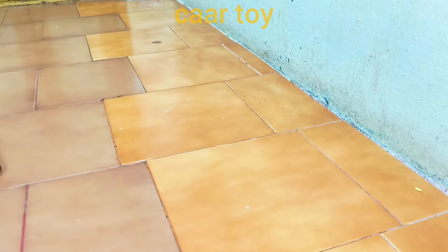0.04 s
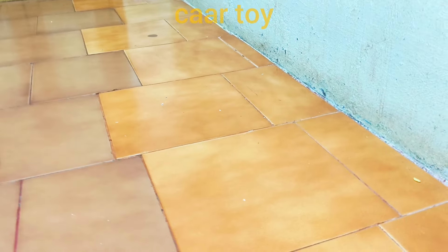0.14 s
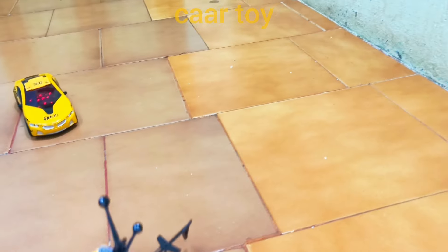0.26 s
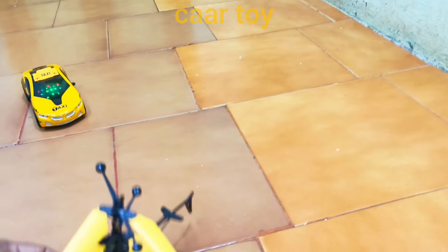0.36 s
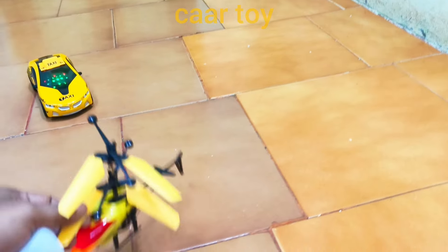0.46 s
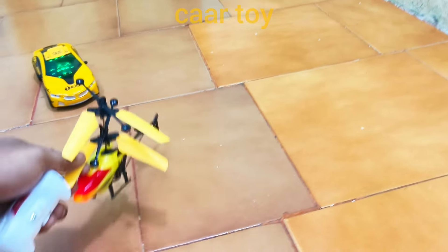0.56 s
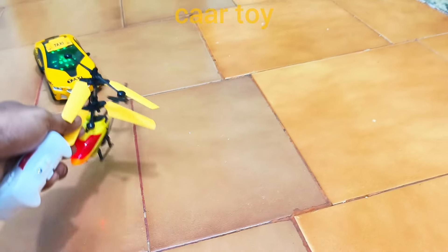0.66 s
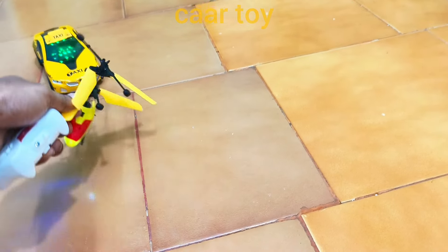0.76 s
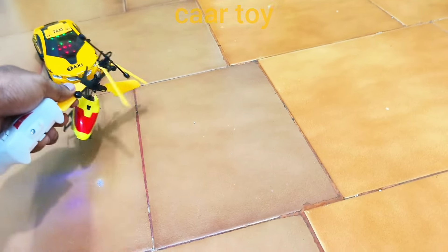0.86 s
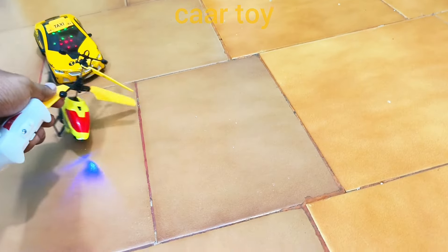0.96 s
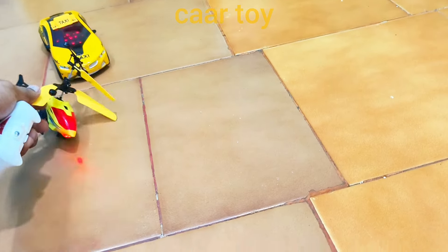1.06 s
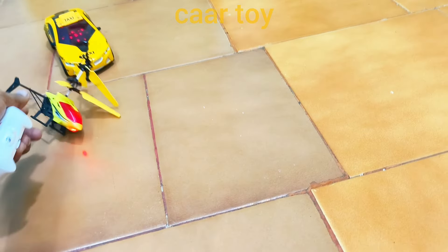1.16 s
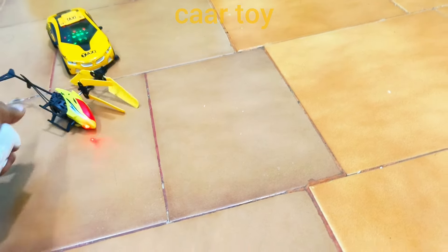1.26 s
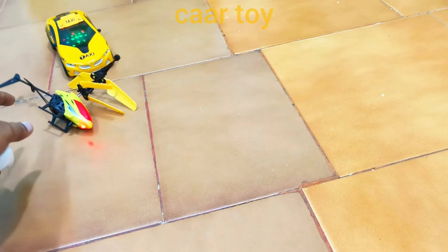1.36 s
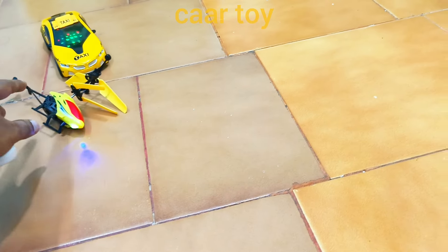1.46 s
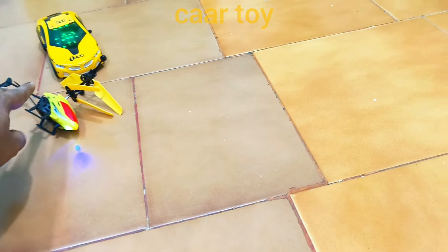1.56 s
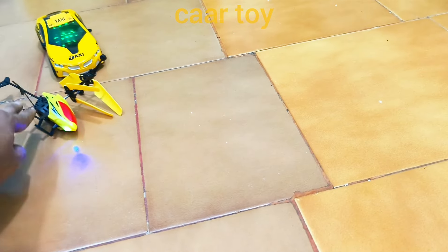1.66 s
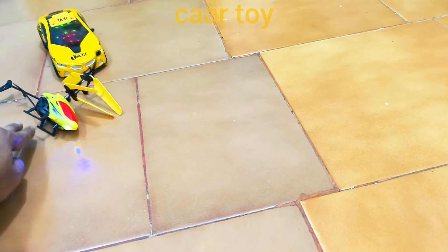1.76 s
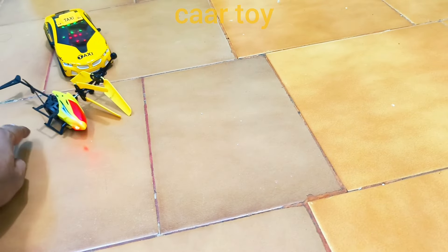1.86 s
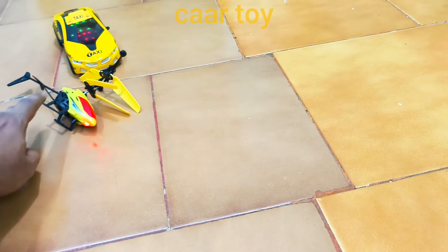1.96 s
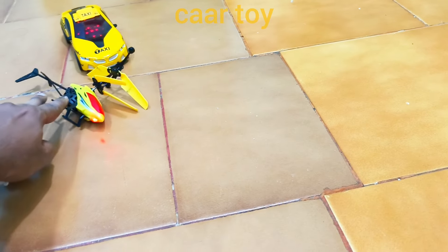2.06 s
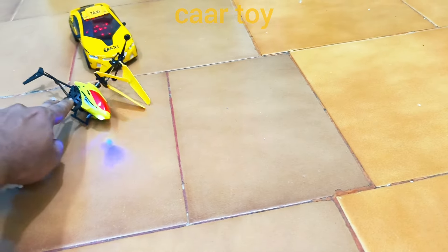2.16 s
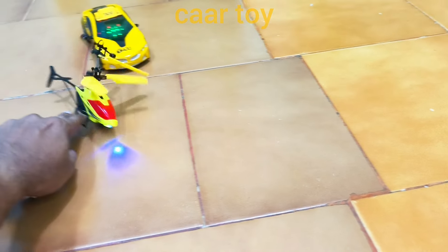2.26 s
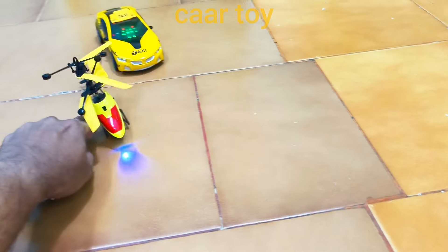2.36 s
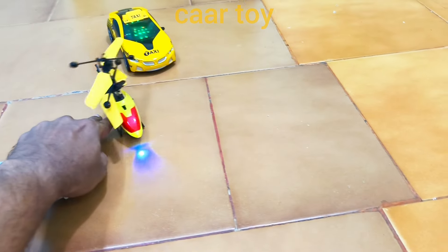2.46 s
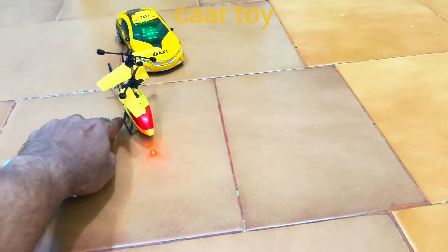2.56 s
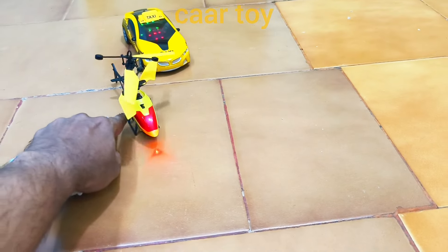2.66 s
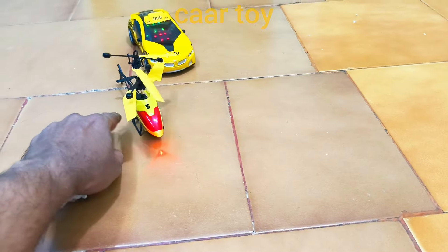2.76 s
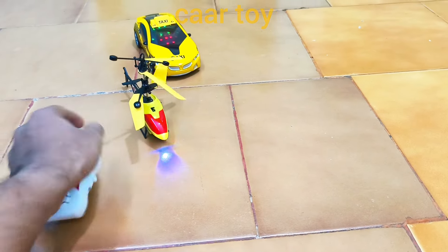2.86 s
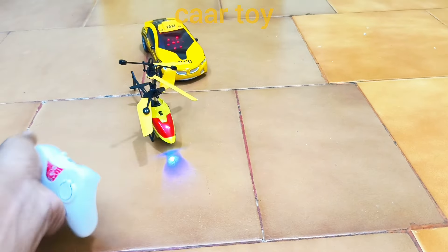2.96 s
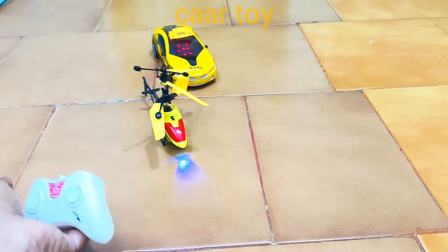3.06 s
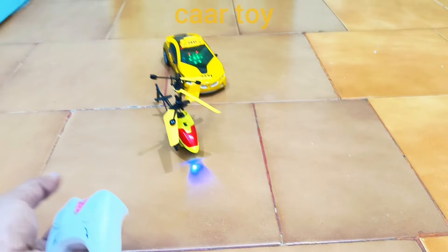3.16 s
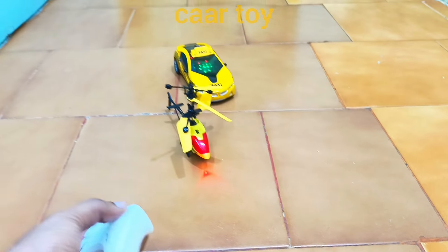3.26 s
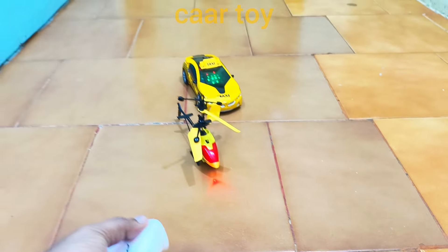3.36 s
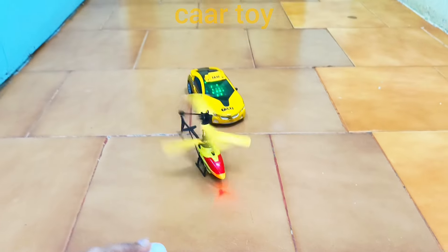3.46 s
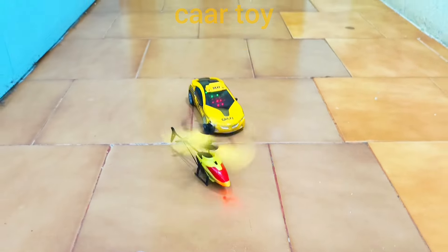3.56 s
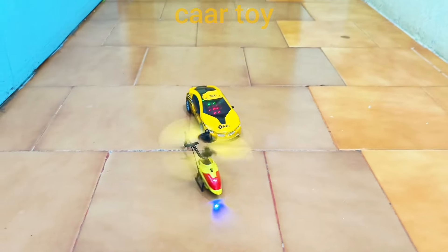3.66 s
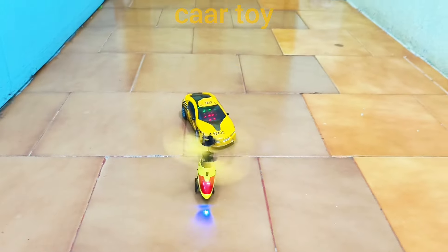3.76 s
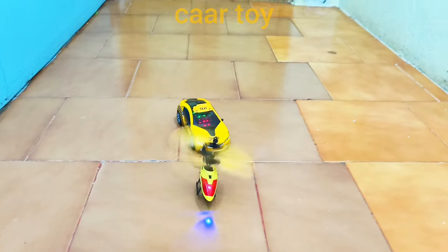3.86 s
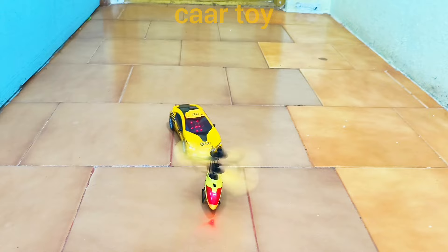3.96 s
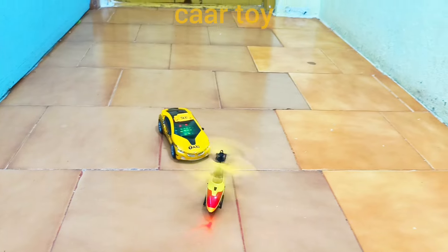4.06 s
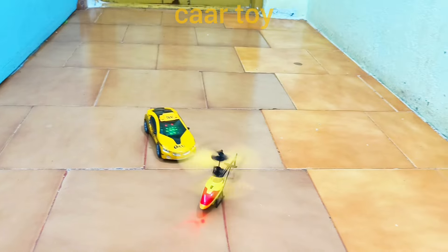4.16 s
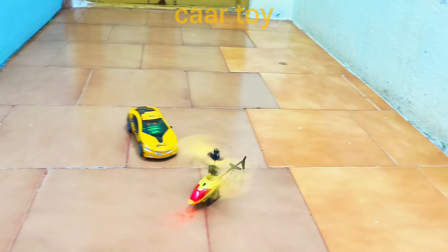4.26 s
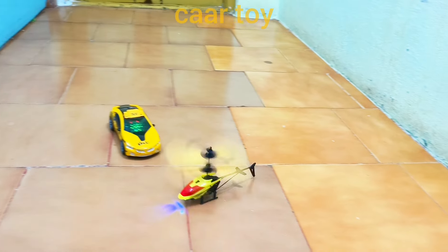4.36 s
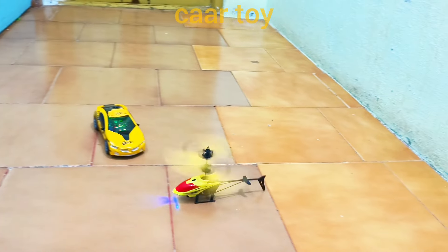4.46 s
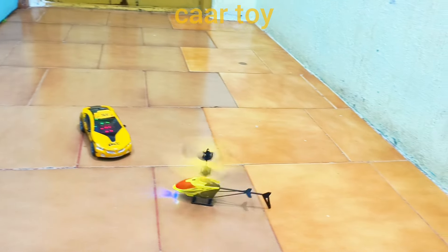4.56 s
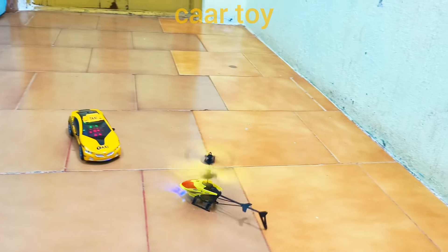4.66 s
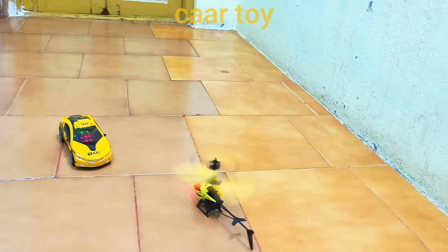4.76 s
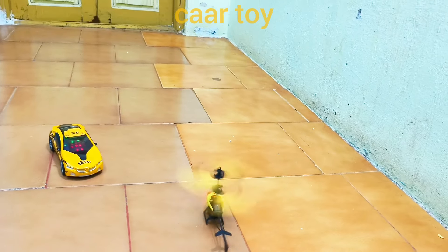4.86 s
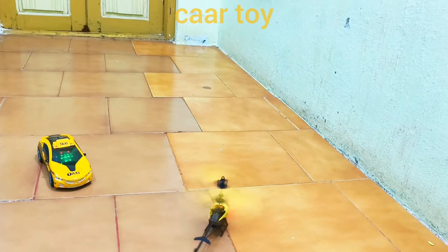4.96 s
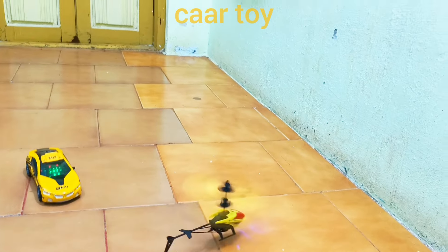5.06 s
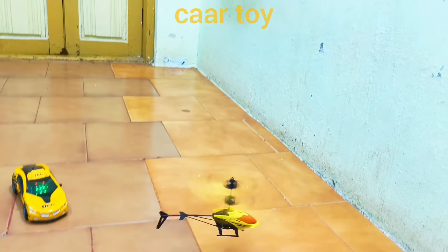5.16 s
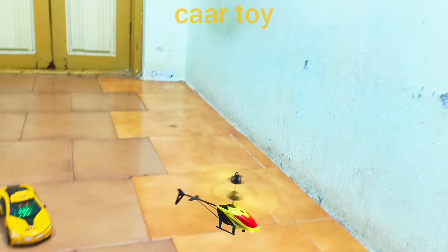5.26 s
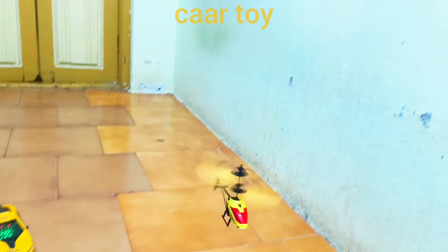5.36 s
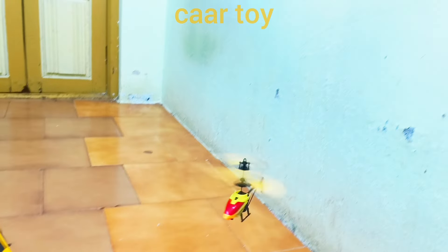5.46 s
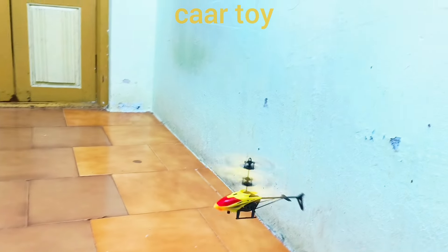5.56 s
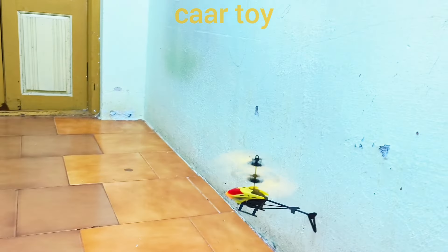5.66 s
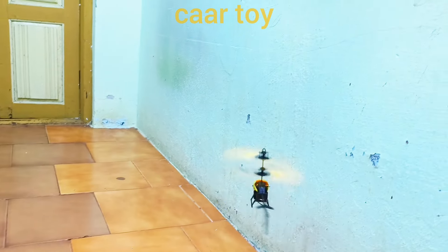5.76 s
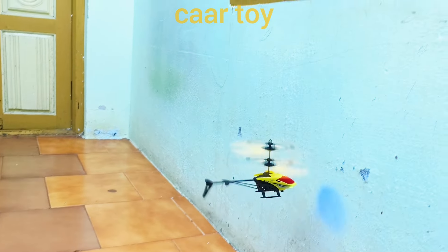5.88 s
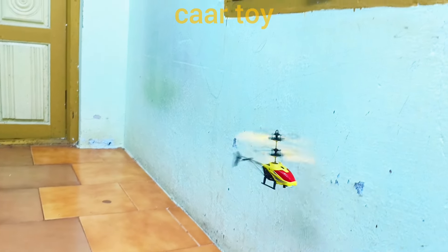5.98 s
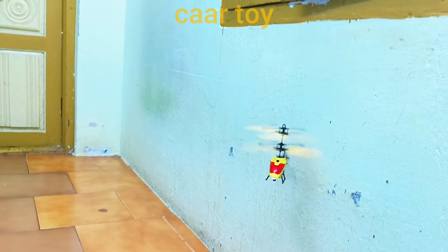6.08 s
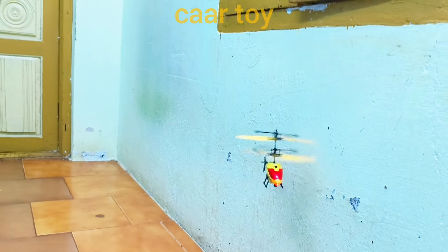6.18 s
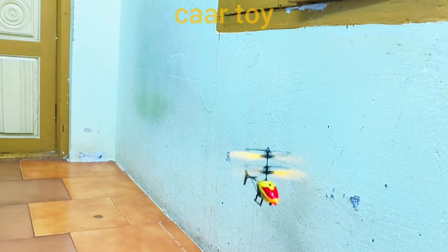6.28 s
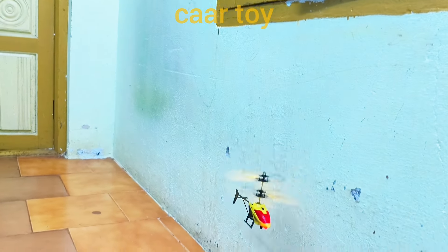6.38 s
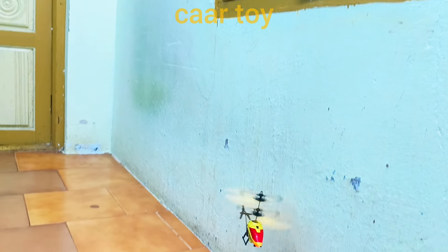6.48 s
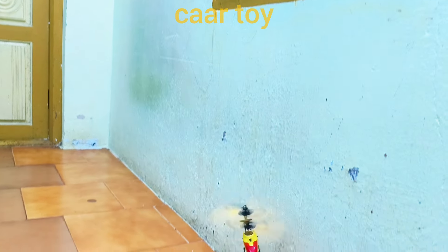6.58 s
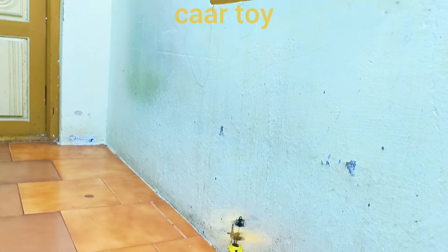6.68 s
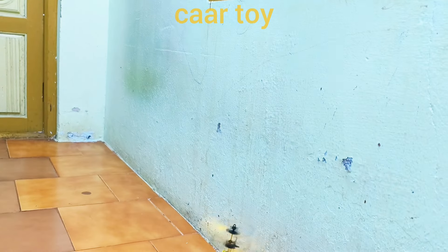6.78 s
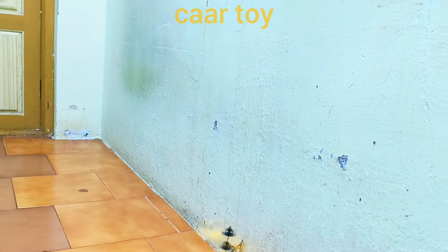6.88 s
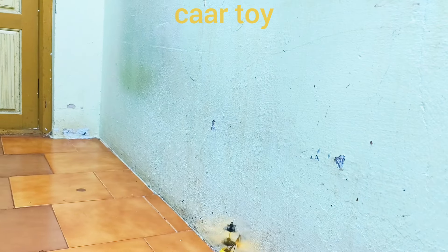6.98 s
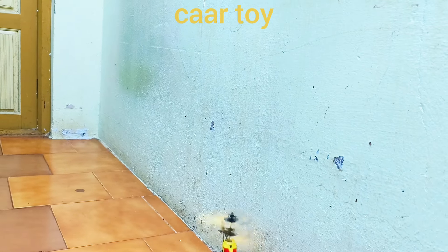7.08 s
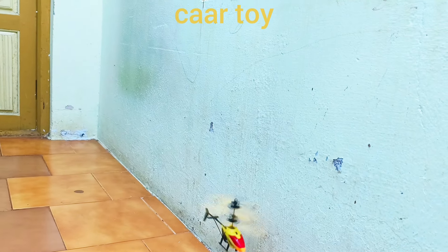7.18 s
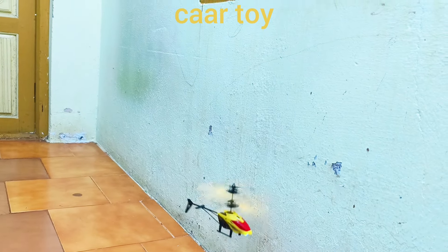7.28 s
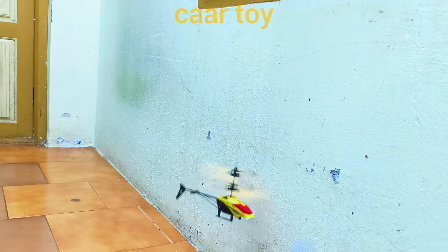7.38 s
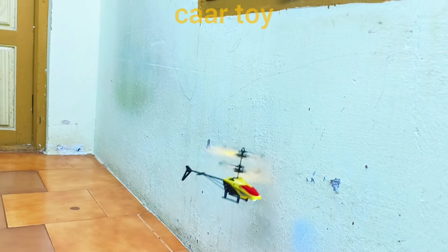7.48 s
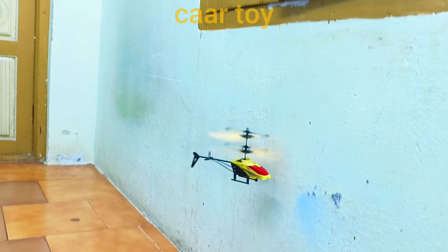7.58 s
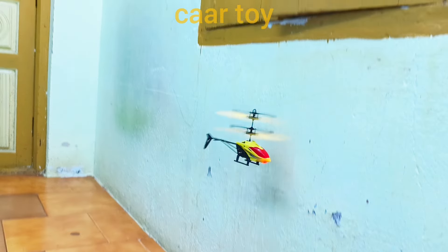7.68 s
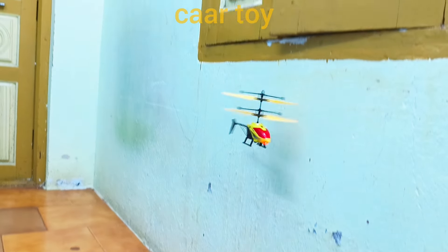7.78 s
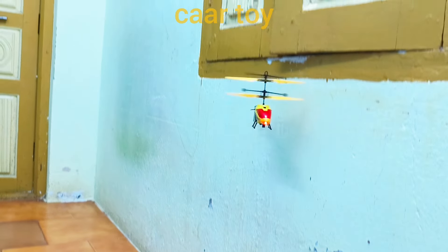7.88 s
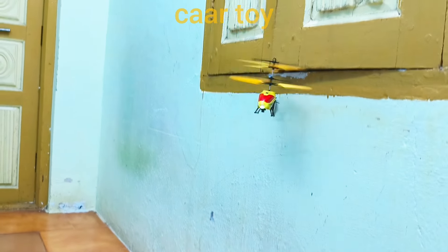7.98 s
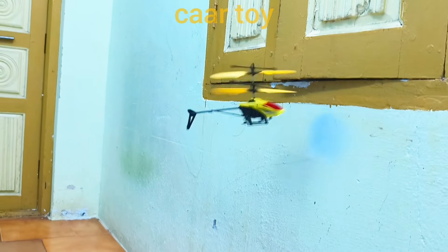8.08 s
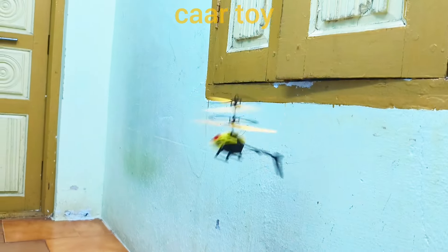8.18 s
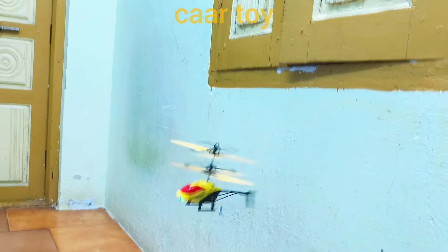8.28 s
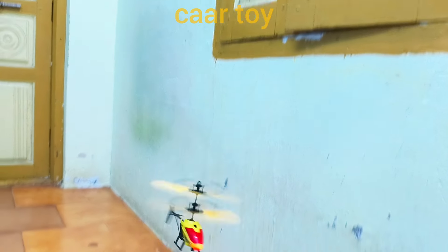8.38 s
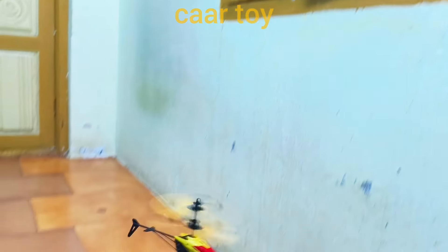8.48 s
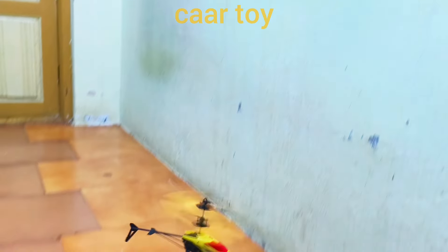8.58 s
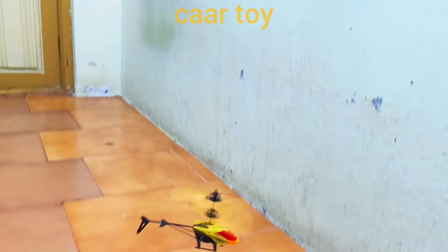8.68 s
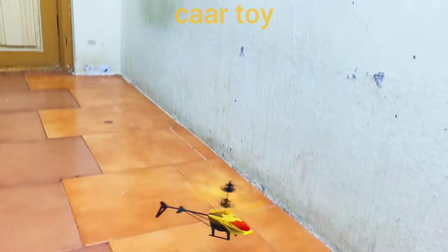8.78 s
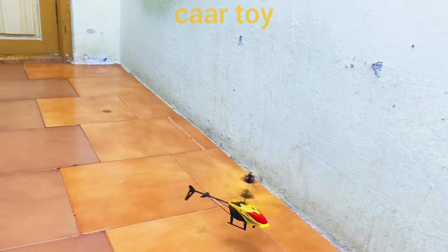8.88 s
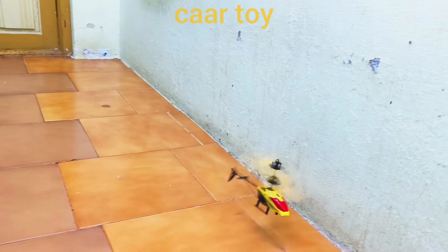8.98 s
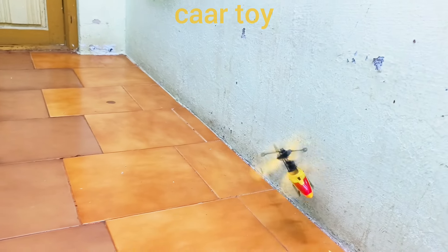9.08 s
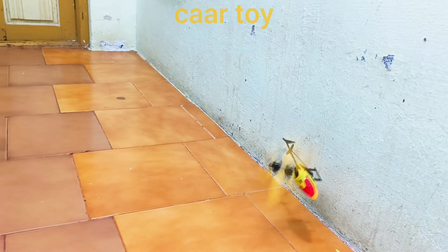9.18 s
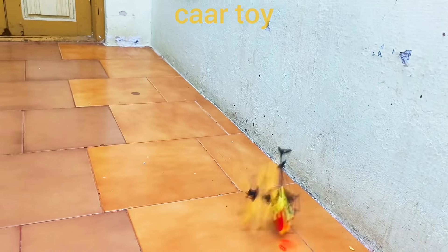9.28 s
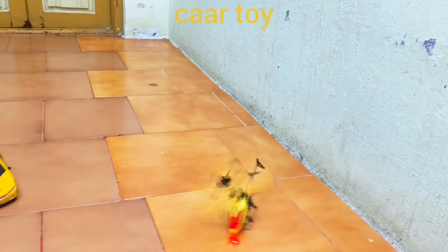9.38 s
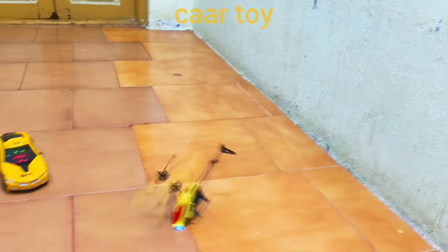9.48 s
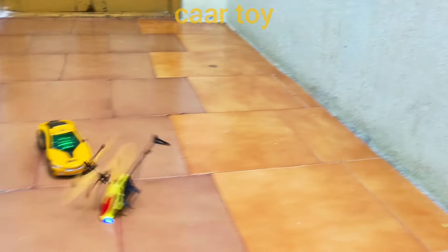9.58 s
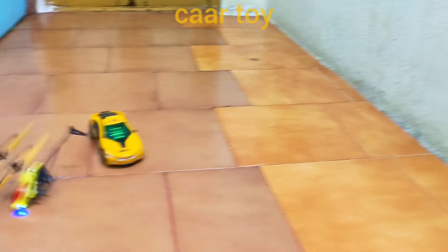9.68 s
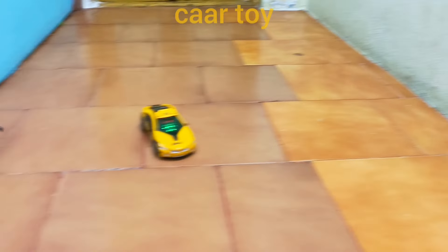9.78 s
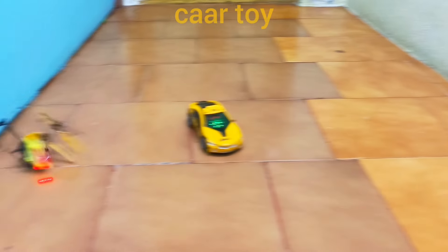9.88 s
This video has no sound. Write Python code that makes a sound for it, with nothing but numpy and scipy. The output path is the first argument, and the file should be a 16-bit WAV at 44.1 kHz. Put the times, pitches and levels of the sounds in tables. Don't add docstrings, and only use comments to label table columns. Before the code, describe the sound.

A toy helicopter is set down with small clacks, then its geared motor whirs shrilly, surging and dipping with hard plastic knocks indoors.

```python
import sys
import numpy as np
from scipy import signal
from scipy.fft import rfft, irfft, next_fast_len
from scipy.io import wavfile
from scipy.ndimage import uniform_filter1d, map_coordinates

SR = 44100
rng = np.random.default_rng(int(sys.argv[2]) if len(sys.argv) > 2 else 0)


def undo_db(level):
    steps = np.asarray(level, float) / 20
    return 10 ** steps


def digitize_waveform(pressure):
    field = np.atleast_2d(pressure).T
    bounded = np.clip(field, -1, 1)
    quanta = np.round(bounded * 32767).astype(np.int16)
    wavfile.write(sys.argv[1], SR, quanta)


N = 437913
T = np.arange(N) / SR


def unit(x):
    return x / np.sqrt(np.mean(x ** 2))


def filtered(x, gain):
    size = next_fast_len(x.shape[-1])
    hz = np.fft.rfftfreq(size, 1 / SR) + 1
    return irfft(rfft(x, size) * gain(hz), size)[..., :x.shape[-1]]


def shape(x, points):
    hz, db = np.transpose(points)
    return filtered(x, lambda f: undo_db(np.interp(np.log(f), np.log(hz), db)))


def band(x, hz, width):
    return filtered(x, lambda f: 1 / (1 + ((f - hz ** 2 / f) / width) ** 2))


def walk(rate, channels=1):
    k = int(SR / rate)
    steps = np.repeat(rng.standard_normal((channels, N // k + 1)), k, axis=1)
    return 1.282 * uniform_filter1d(uniform_filter1d(steps, k), k)[:, :N]


def pair(alike):
    mid, side = rng.standard_normal((2, N))
    alike = np.clip(alike, 0, 1)
    return np.sqrt(alike) * mid + np.sqrt(1 - alike) * side * np.array([[1], [-1]])


# start_s, goal_mesh_hz, lag_s
THROTTLE_MOVES = [(3.419, 1946, 0.094), (3.585, 4062, 0.081), (3.84, 3382, 0.2), (4.102, 3286, 0.03),
                  (4.409, 3850, .26), (4.971, 4567, 0.079), (5.212, 4334, 0.16), (5.417, 3705, 0.071),
                  (5.537, 4730, .12), (5.759, 4295, 0.17), (6.023, 3202, .11), (6.368, 4547, 0.075),
                  (6.648, 3980, 0.025), (6.667, 4590, 0.097), (7.04, 4270, 0.38), (7.294, 4623, 0.2),
                  (7.535, 4435, .114), (7.823, 3498, 0.31), (8.025, 1888, 0.058), (8.107, 3307, .2),
                  (8.28, 4585, 0.092), (9.108, 3100, 0.082), (9.213, 3915, .039), (9.477, 4318, 0.054),
                  (9.751, 3550, .081)]
START_HZ = 1510


def speed():
    hz = np.full(N, 1. * START_HZ)
    for s, goal_hz, lag in THROTTLE_MOVES:
        i = int(s * SR)
        hz[i:] = goal_hz + (hz[i] - goal_hz) * np.exp(-T[:N - i] / lag)
    return hz


TEETH = 21


def gear_mesh(turn, shaft, play, mesh_db, second_db):
    smear = 2 * np.pi * np.cumsum(75 * play * walk(300, channels=2), axis=1) / SR
    teeth = TEETH * turn + smear
    mesh = undo_db(mesh_db - 3 + 4 * walk(25, channels=2)) * np.sin(teeth)
    second = undo_db(second_db + 4 * walk(30, channels=2)) * np.sin(2 * teeth)
    third_db = uniform_filter1d(mesh_db, SR) - 8
    third = undo_db(third_db + 3 * walk(15, channels=2)) * np.sin(3 * teeth)
    wobble = 1 + .5 * np.cos(shaft + 1)
    rough = unit(band(pair(0.95), 330, 530)) * np.sin(2 * TEETH * shaft)
    chatter = undo_db(uniform_filter1d(second_db, SR // 8) + 11.0) * (0.27 + play) * rough
    slap = unit(band(pair(.5), 90, 180)) * np.sin(TEETH * shaft)
    chatter += undo_db(mesh_db + 4) * play * slap
    return undo_db(11.0) * wobble * (mesh + second + third) + chatter


# turns_per_shaft_turn, level_db (under the brush tone)
MOTOR_TONES = [(8 / 3, -13.5), (8, 0), (32 / 3, -32), (40 / 3, -1), (16, -0.5)]


def brush_motor(turn, play, brush_db):
    steady_db = uniform_filter1d(brush_db, SR // 4)
    tones = 0
    for ratio, db in MOTOR_TONES:
        tones = tones + undo_db(steady_db + db + 5 * play * walk(30, channels=2)) * np.sin(ratio * turn)
    return undo_db(5.5) * tones


# pitch_hz, density_db (per Hz)
HISS_COLOUR = [(1760, -31.5), (3000, -12), (4000, -6.5), (5600, -5), (7600, 0), (9200, -1.5), (11500, -4),
               (13000, -10.5), (14300, -4.5), (15500, 2), (15800, -2), (15950, -46)]


def blade_hiss(shaft, hiss_db):
    chop = 1 + 0.1 * np.cos(shaft / 3) + 0.064 * np.cos(shaft)
    level = undo_db(hiss_db + 4.5 + 1.25 * walk(30) + 1.0 * walk(200))
    return level * chop * unit(shape(pair(0.78), HISS_COLOUR))


# pitch_hz, density_db (per Hz)
BUZZ_COLOUR = [(300, -22), (1000, -10.5), (1250, -7.5), (1800, -3.5), (2450, 2.5), (2800, 3.5),
               (3300, -6.5), (4200, -9)]
# pitch_hz, width_hz, level_db (over the blade hiss)
LOOSE_PARTS = [
    (7660, 430, -2.5),
    (2520, 250, -12),
]
FLOOR_EDGE_HZ, AIRBORNE_LOWS_DB = 1130, 8


def frame_buzz(play, buzz_db, hiss_db):
    frame = unit(shape(pair(0.88), BUZZ_COLOUR))
    lows = filtered(frame, lambda f: 1 / (1 + (f / FLOOR_EDGE_HZ) ** 20))
    lows_gain = undo_db(AIRBORNE_LOWS_DB * (0.73 - play) * 2) - 1
    buzz = undo_db(buzz_db + 3.0 + 1.66 * walk(40) + 2 * walk(150)) * (frame + lows_gain * lows)
    for hz, width, db in LOOSE_PARTS:
        buzz += undo_db(hiss_db + db + 1.5 * walk(60)) * play ** 2 * unit(band(pair(0.56), hz, width))
    return buzz


# start_s, level_db (at the phone), facing_db (gearbox to
FLIGHT_LEVELS = [(3.42, -70, 0), (3.49, -39, 9), (3.6, -30, 2), (3.71, -26, 2.5), (3.82, -30.5, 1.5),
                 (4.43, -28.5, -2), (5.3, -29.5, 0), (5.75, -30, -0.5), (6.25, -32, 1.5), (6.38, -31.5, 2.5),
                 (6.85, -31, -2.5), (7.5, -31, 0), (7.81, -30, -3.5), (8.1, -33.5, 0.5), (8.4, -37.5, 2.5),
                 (8.85, -35.5, 4), (9.3, -35.5, 1.5), (9.93, -35.5, -0.5)]
# start_s, gear_play (0-1)
GEAR_PLAY = [(3.4, 1), (4.9, 1), (5.1, .55), (6.8, .5), (6.9, .3), (7.1, .35), (7.3, .55), (8.4, .6),
             (8.6, .15), (9.05, .2), (9.2, .9), (9.93, .8)]
# mesh_hz, then mesh_db, second_multiple_db, brush_db, buzz_db (over the blade hiss)
SPEED_COLOURS = [(2300, -5, -12, -30, -5), (2630, -3, -17, -50, -2), (3320, -9.5, -11, -28, -8.5),
                 (3550, -12, -6, -24, -7.5), (3850, -12.5, -3, -27, -8), (4010, -17, -9, -13, -8),
                 (4454, -5, -8, -17, -8.5), (4590, -7, -6, -18, -8)]
# mesh_db, second_multiple_db, brush_db, buzz_db
TRUE_RUN_GAINS = (1, 5, 0.5, -1.5)


def helicopter():
    s, loud_db, facing_db = np.transpose(FLIGHT_LEVELS)
    mesh_hz = uniform_filter1d(speed(), SR // 60)
    hiss_db = uniform_filter1d(np.interp(T, s, loud_db), SR // 30)
    play = np.interp(T, *np.transpose(GEAR_PLAY))
    hz, *colours = np.transpose(SPEED_COLOURS)
    layers_db = []
    for colour, true_db in zip(colours, TRUE_RUN_GAINS):
        layers_db.append(hiss_db + np.interp(mesh_hz, hz, colour) + true_db * (1 - 2 * play))
    mesh_db, second_db, brush_db, buzz_db = layers_db
    shaft = 2 * np.pi * np.cumsum(mesh_hz) / SR / TEETH
    turn = shaft + 0.023 * walk(6, channels=2) + 0.051 * walk(60)
    running = np.clip((T - s[0]) / 0.0092, 0, 1)
    engaged = np.clip((T - 3.585) / 0.016, .3, 1)
    facing = undo_db(np.interp(T, s, facing_db))
    gearbox = gear_mesh(turn, shaft, play, mesh_db, second_db) + brush_motor(turn, play, brush_db)
    air_and_frame = blade_hiss(shaft, hiss_db) + frame_buzz(play, buzz_db, hiss_db)
    return running * (engaged * facing * gearbox + air_and_frame)


def knocks(rows, parts, body, gain_db, spread, tick):
    out = np.zeros((2, N))
    noise = pair(0.81) * undo_db(3.86 * walk(120))
    for j, (hz, width, rattle, ring, ring_width) in enumerate(body):
        push, ticks = np.zeros((2, N))
        for s, db, part in rows:
            i = int(s * SR)
            t = T[:min(SR // 4, N - i)]
            peak = undo_db(db + parts[part][j])
            push[i:i + len(t)] += peak * 0.39 * np.exp(-t / (rattle * spread))
            ticks[i + 8] += peak * tick
        out += band(ticks, hz, width) * SR / (np.pi * width)
        dull = unit(band(noise, hz, width))
        sharp = unit(band(noise, hz, ring_width))
        out += push * ((1 - ring) * dull + ring * sharp)
    return undo_db(gain_db) * out


# start_s, peak_db, part_struck
BUMP_TIMES = [(3.649, -23, "shell"), (5.1, -21, "flat"), (5.699, -27, "legs"), (6.201, -9, "skid"),
              (6.219, -32, "skid"), (6.601, -9, "legs"), (7.093, -14, "legs"), (7.272, -20, "legs"),
              (7.859, -17, "skid"), (8.046, -6, "flat"), (8.07, -8, "flat"), (8.089, -19.5, "flat"),
              (8.119, -31, "shell"), (9.095, -10, "blade"), (9.128, -6.5, "blade"), (9.169, -12, "skid"),
              (9.355, -6.5, "blade"), (9.374, -27, "shell"), (9.838, -16, "hollow"), (9.854, -2, "hollow"),
              (9.879, -3, "blade"), (9.904, -32, "legs")]
TURNING_PARTS = {"hollow": (-8.5, -33, -28, 1), "shell": (-34, -28, -2, -11),
                 "skid": (-38.5, -38.5, 0, -3.5), "blade": (-33, -22, -11.5, -0.5),
                 "legs": (-17.5, -37, 4, 0), "flat": (-13.5, -3, -8.5, -1.5)}
# pitch_hz, width_hz, rattle_s, ring_share (0-1), ring_width_hz
SPINNING_BODY = [
    (750, 1900, 0.032, 0.067, 900),
    (2000, 1400, 0.02, .3, 1400),
    (4500, 7200, 0.028, 0.39, 160),
    (7500, 7300, 0.019, 0.26, 11000),
]


def bumps():
    return knocks(BUMP_TIMES, TURNING_PARTS, SPINNING_BODY, gain_db=-1.08, spread=1.12, tick=2.16)


# start_s, peak_db, part_struck
CLACK_TIMES = [(0.866, -32, "legs"), (1.024, -43.5, "shell"), (1.05, -36.5, "shell"), (1.128, -37, "legs"),
               (1.232, -29, "blade"), (1.284, -21.5, "blade"), (1.35, -35.5, "skid"), (1.39, -53, "skid"),
               (1.76, -48.5, "flat"), (1.825, -36, "legs"), (1.852, -21.5, "hollow"), (2.147, -55, "flat"),
               (2.262, -34, "legs"), (2.326, -26.5, "hollow"), (2.378, -22, "blade"),
               (2.554, -31.5, "blade"), (2.655, -38.5, "legs"), (2.979, -56.5, "flat"),
               (3.328, -59.5, "flat"), (3.426, -33.5, "flat"), (3.447, -28.5, "flat")]
RESTING_PARTS = {"hollow": (-4.5, -9, -38, -27), "shell": (-30, 3, 1, -4), "skid": (-37, -35, -6.5, 7.5),
                 "blade": (-50, -13, -7, -0.5), "legs": (-41, -8.5, 0.5, -6),
                 "flat": (-10.5, -3, 3.5, -5.5)}
# pitch_hz, width_hz, rattle_s, ring_share (0-1), ring_width_hz
RESTING_BODY = [
    (992, 236, 0.015, 0.18, 180),
    (2300, 840, 0.018, 0, 1800),
    (4450, 8300, 0.057, 0.16, 89),
    (8150, 3700, 0.011, 0.1, 4600),
]


def clacks():
    return knocks(CLACK_TIMES, RESTING_PARTS, RESTING_BODY, gain_db=0.23, spread=0.88, tick=2.53)


# start_s, pitch_hz, peak_db, ring_s
PING_TIMES = [
    (0.865, 2306, -36, 0.015),
    (1.049, 1757, -41.5, 0.022),
    (1.13, 4450, -48, .05),
    (1.39, 4450, -37, 0.024),
    (2.262, 4500, -36, 0.013),
    (2.378, 2620, -29.5, 0.02),
]


def pings():
    quiver = .3 + walk(450)[0]
    out = np.zeros(N)
    for s, hz, db, ring in PING_TIMES:
        fade = (T > s) * np.exp(-np.abs(T - s) / ring)
        out += undo_db(db) * fade * quiver * np.sin(2 * np.pi * hz * T)
    return out


# pitch_hz, t60_s
ROOM_DECAY = [(300, 0.3), (1200, 0.45), (3000, 0.3), (8000, 0.29), (14000, 0.04)]


def room(dry, wet_db):
    t = T[:SR // 2]
    tail = np.zeros((2, len(t)))
    for hz, t60 in ROOM_DECAY:
        tail += band(rng.standard_normal((2, len(t))), hz, 1.52 * hz) * undo_db(-60 * t / t60)
    tail *= np.clip(t / 0.0056, 0, 1) / np.sqrt(np.sum(tail ** 2) / 2)
    return dry + undo_db(wet_db) * signal.fftconvolve(dry, tail, axes=1)[:, :N]


# start_s, peak_db, t60_s
SKID_CHATTER = [
    (3.449, -32, 1),
    (3.52, -40, 0.68),
    (3.597, -26, 0.32),
    (9.369, -15, 0.24),
    (9.52, -26, 0.52),
]
SWITCH_S, SWITCH_DB = .154, -48


def skids():
    gain = sum((T > s) * undo_db(db - 60 * np.abs(T - s) / t60) for s, db, t60 in SKID_CHATTER)
    taps = pair(0.75) * undo_db(3.9 * walk(150))
    ring = unit(band(band(taps, 2510, 730), 2510, 730)) + 0.31 * unit(band(taps, 4100, 7500))
    fade = (T > SWITCH_S) * np.exp(-np.abs(T - SWITCH_S) / 0.0016)
    click = undo_db(SWITCH_DB) * fade * unit(band(taps, 2900, 5100))
    return room(undo_db(-1.5) * gain * ring, -5.0) + click


# start_s, pitch_hz, level_db
BOOM_PATH = [
    (5.65, 331, -58.5),
    (6.096, 331.3, -55),
    (6.138, 380.6, -46),
    (6.236, 313, -52),
    (6.466, 364, -50),
    (6.864, 289, -51.5),
    (7.0, 358, -79),
]


def boom():
    s, hz, db = np.transpose(BOOM_PATH)
    phase = 2 * np.pi * np.cumsum(np.interp(T, s, hz) + 7 * walk(30)[0]) / SR
    level_db = np.interp(T, s, db, left=-200, right=-200)
    return undo_db(level_db + 0.5 + 4.7 * walk(15)) * np.sin(phase)


def wash(rows):
    power = 0
    for s, swell, fade, db in rows:
        power = power + undo_db(db) ** 2 * np.exp(-2 * np.abs(T - s) / np.where(T < s, swell, fade))
    return np.sqrt(power)


# start_s (at its height), swell_s, fade_s, peak_db
FLOOR_GUSTS = [(3.6, .15, 0.046, -55), (4.7, 0.41, 0.28, -44.5), (5.4, .2, .6, -53.5),
               (6.93, 0.54, .15, -50.5), (8.11, 0.042, 0.065, -36.5), (9.93, .12, 0.092, -39)]
# start_s (at its height), swell_s, fade_s, peak_db
WALL_GUSTS = [(3.6, .2, 1.7, -67), (5.36, .25, 0.068, -46), (6.35, 1, 0.32, -48.5),
              (7.05, 0.34, 0.45, -39.5), (7.65, .1, 0.18, -43), (8.08, 0.022, 0.064, -51),
              (8.85, 0.21, .2, -56), (9.13, 0.027, 0.11, -33), (9.36, 0.019, .07, -34),
              (9.89, 0.028, 0.42, -20.5)]


def draught():
    low = unit(band(pair(0.97), 157.4, 28.5))
    upper = unit(shape(pair(0.85), [(220, -10), (300, -4), (335, 0.5), (380, -6.5), (550, 1.0),
                                    (800, -2), (1200, -13.0)]))
    return (T > FLIGHT_LEVELS[0][0]) * (wash(FLOOR_GUSTS) * low + wash(WALL_GUSTS) * upper)


# start_s, peak_db, pitch_hz, left_minus_right_db
HAND_THUMPS = [(0.2, -47, 80.7, -2), (0.348, -39, 86.1, -2), (0.658, -34.5, 73.3, -2),
               (0.819, -43.5, 71.4, 0.0), (0.948, -40, 69, -0.5), (1.236, -35, 61.9, 1.0),
               (1.388, -44.5, 57, 11.0), (1.919, -45, 99, 0.5), (2.059, -49, 98, 0.0),
               (2.219, -58, 61.9, -1), (2.527, -43, 60, -2), (2.617, -47, 75.4, 0.0),
               (6.615, -44.5, 87, 0.0), (9.358, -46, 59.4, 1), (9.858, -32.5, 62, 17)]


def thumps():
    out = np.zeros((2, N))
    for s, db, hz, pan_db in HAND_THUMPS:
        i = int(s * SR)
        t = T[:min(SR // 5, N - i)]
        sagging = np.sin(2 * np.pi * hz * t * (1 - 2.2 * t))
        ring = sagging * (1 - np.exp(-t / 0.0063)) * np.exp(-t / 0.029)
        shove = np.sin(2 * np.pi * 24 * t) * np.exp(-t / 0.027) * np.array([[.3], [.05]])
        pan = np.array([[pan_db], [-pan_db]]) / 2
        out[:, i:i + len(t)] += undo_db(db + 7.0 + pan) * (ring + shove)
    return out


# pitch_hz, density_db (per Hz)
HOUSE_COLOUR = [(15, -61), (25, -24), (87, -1), (166, -4.5), (256, -10), (309, -10.5), (427, -15.5),
                (591, -15.5), (863, -22.5), (2480, -28), (12500, -50.5), (14400, -56), (16000, -61)]
# pitch_hz, level_db (rms), width_hz
HUM_BANDS = [(166.6, -58, 17.5), (323.5, -66.5, 11.6), (528, -68, 37), (598, -70, 19)]
HOUSE_LEVEL_DB = -52.5
MAINS_HZ, MAINS_DB = 99.7, -54.5


def house():
    air = shape(pair(0.96), HOUSE_COLOUR)
    high = shape(pair(0.091), [(hz, db - 30 * (hz < 500)) for hz, db in HOUSE_COLOUR])
    murmur = undo_db(HOUSE_LEVEL_DB - 3.5) * (air + high) / np.sqrt(np.mean(air ** 2))
    hum = sum(undo_db(db + 1.4 * walk(3.04)) * unit(band(pair(0.92), hz, width)) for hz, db, width in HUM_BANDS)
    mains = undo_db(MAINS_DB + 2.5 * walk(7)) * np.sin(2 * np.pi * MAINS_HZ * T)
    return murmur + hum + mains


def scene():
    blows = clacks() + bumps() + pings()
    left, right = blows + undo_db(-2.0) * helicopter()
    drift = 9 * walk(2)[0]
    right = map_coordinates(right, [np.arange(N) + drift], order=3)
    near = room(np.array([left, right]), -1.87)
    return near + skids() + boom() + draught() + thumps() + house()


def top_cut(x):
    return signal.sosfilt(signal.butter(12, 16640, fs=SR, output="sos"), x)


def record(dry):
    fast = speed() > 4150
    for hz, width, often in [(3150, 220, -.5), (3800, 250, .7), (3450, 170, 1.1)]:
        gap = uniform_filter1d(1. * (fast & (walk(45)[0] > often)), SR // 100)
        edges = [hz - width / 2, hz + width / 2]
        sos = signal.butter(4, edges, "band", fs=SR, output="sos")
        dry = dry - gap * signal.sosfiltfilt(sos, dry)
    dry = filtered(dry, lambda f: np.clip((15950 - f) / 150, .001, 1))
    tilt = [(100, 0), (9000, 0.0), (12000, 2.5), (14000, 12.5), (15700, 0.0)]  # (Hz, dB)
    left = shape(dry[0], tilt)
    right = shape(dry[1], [(hz, -db) for hz, db in tilt])
    mix = np.tanh(1.113 * np.array([left, right])) / 1.076
    return top_cut(mix)


dry = scene()
out = record(dry)
digitize_waveform(out)
```